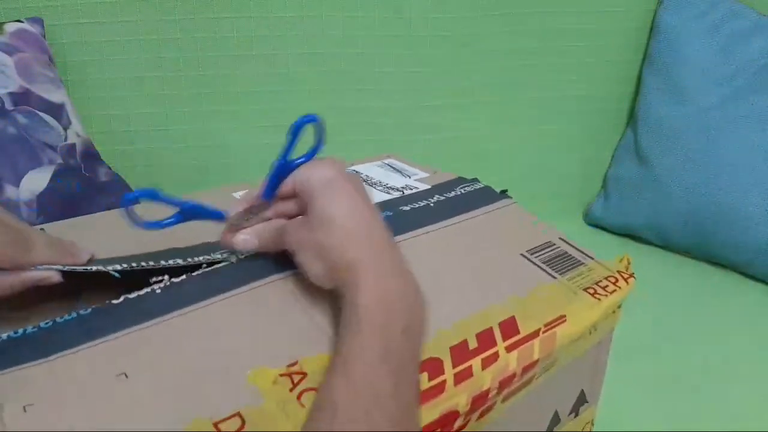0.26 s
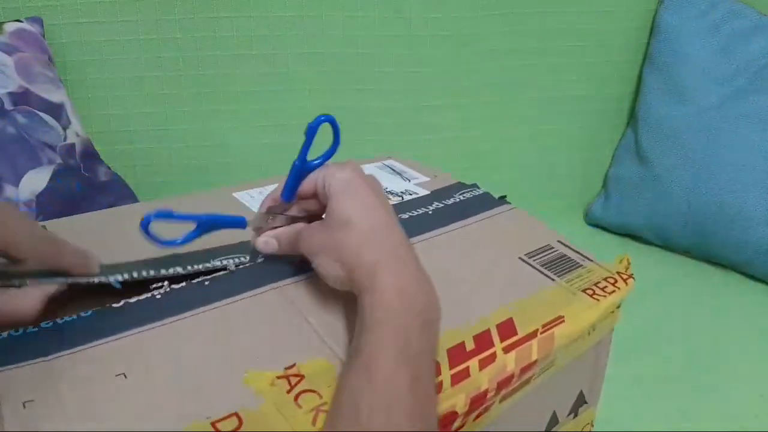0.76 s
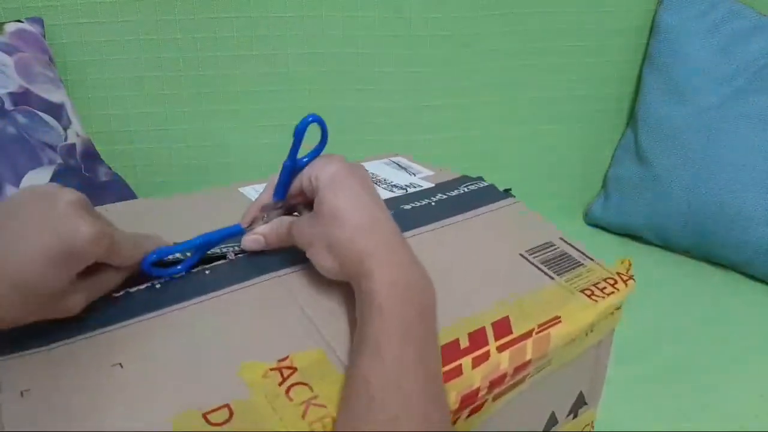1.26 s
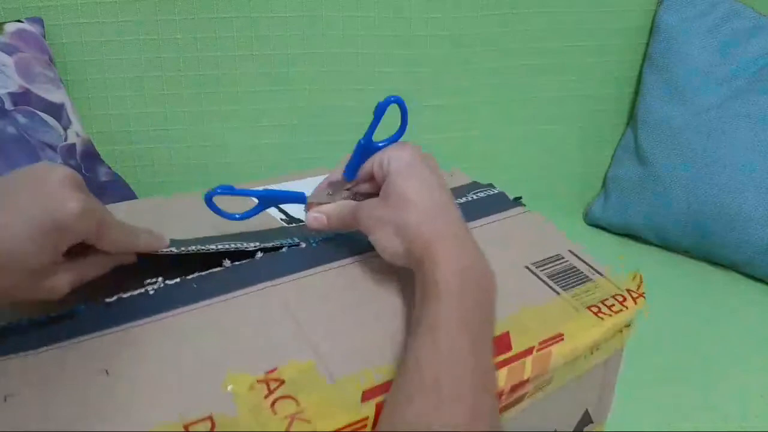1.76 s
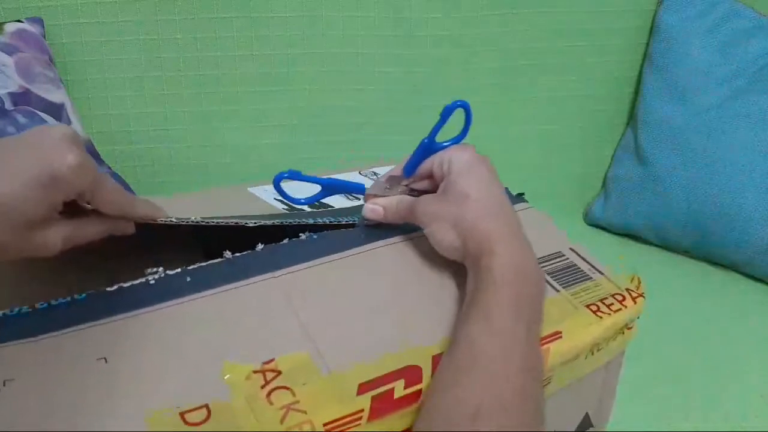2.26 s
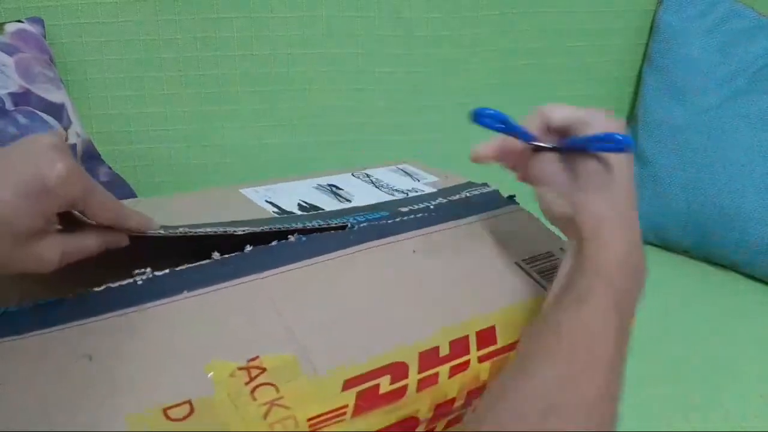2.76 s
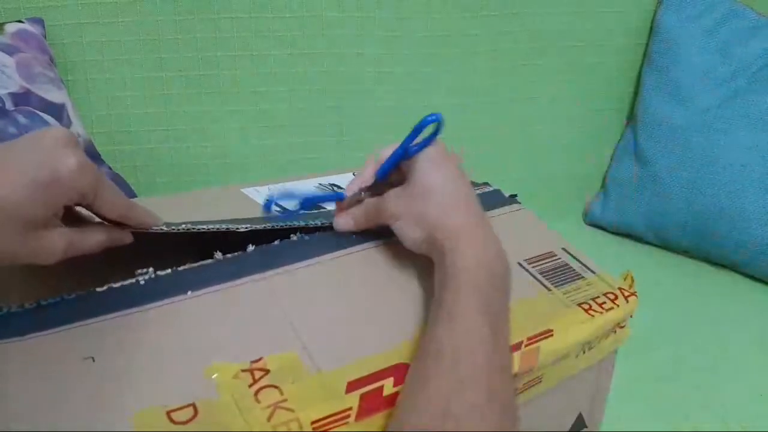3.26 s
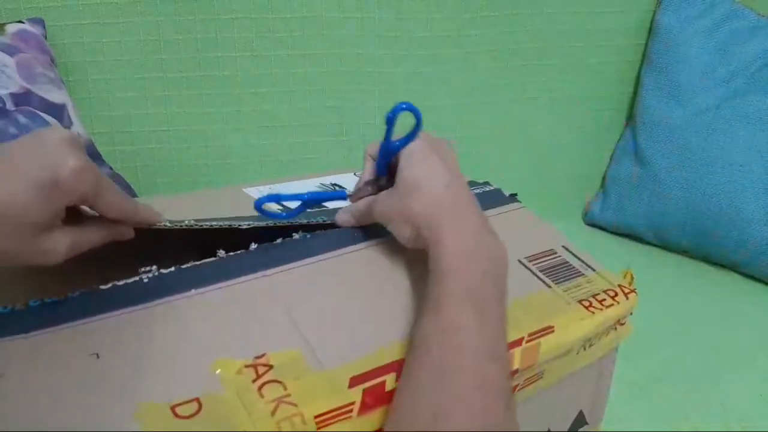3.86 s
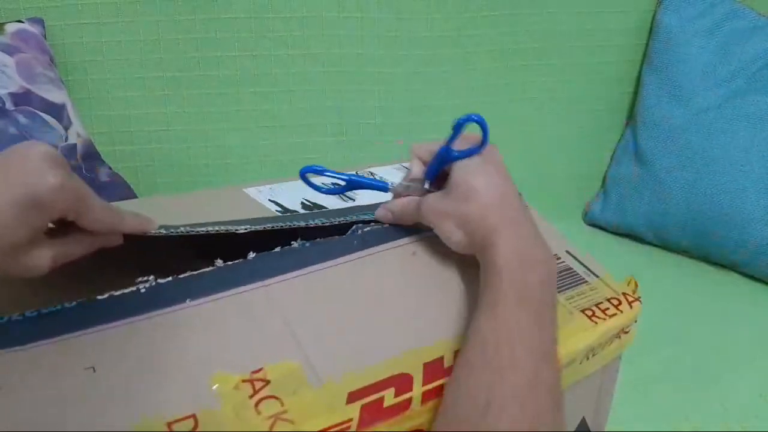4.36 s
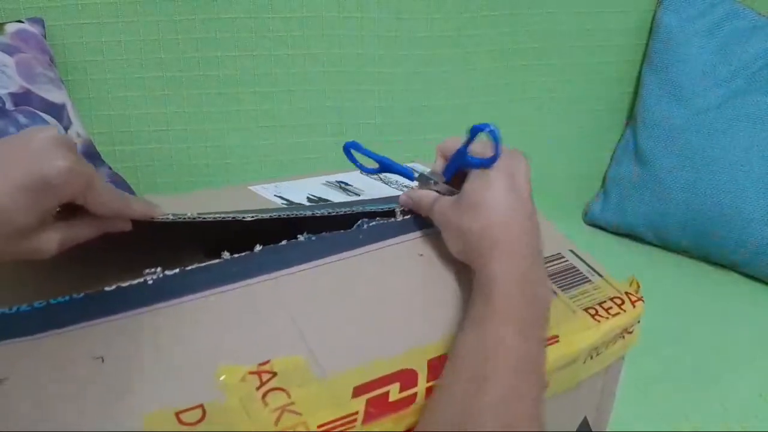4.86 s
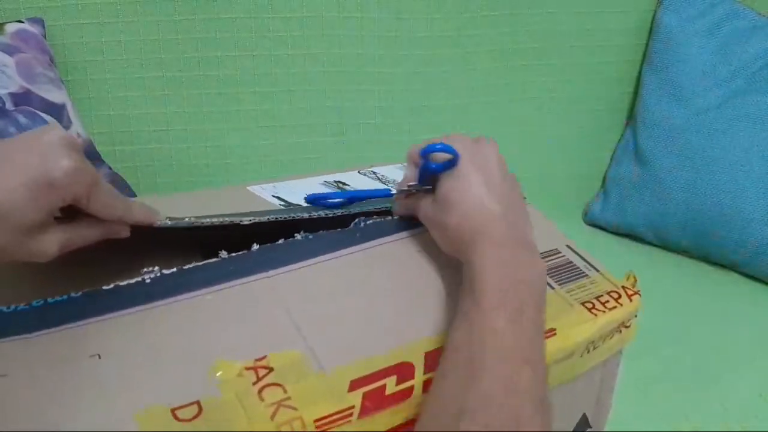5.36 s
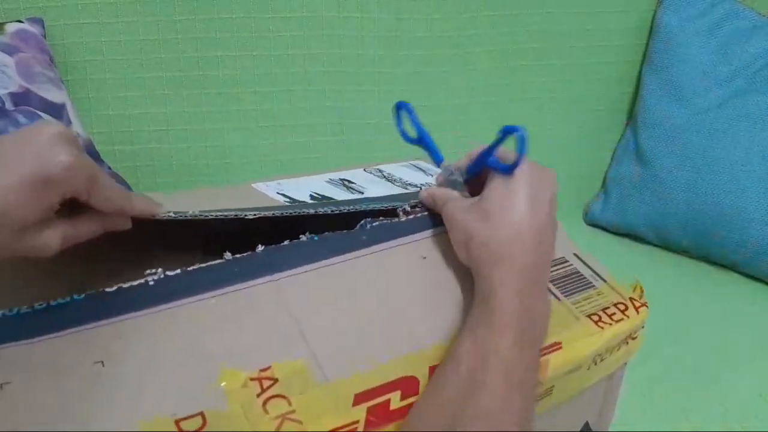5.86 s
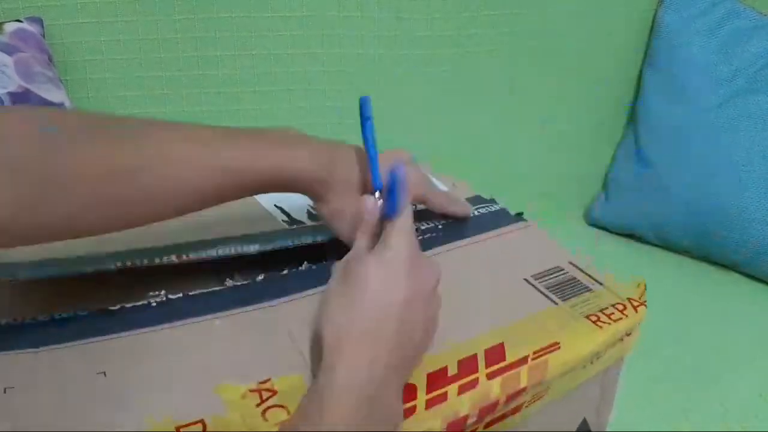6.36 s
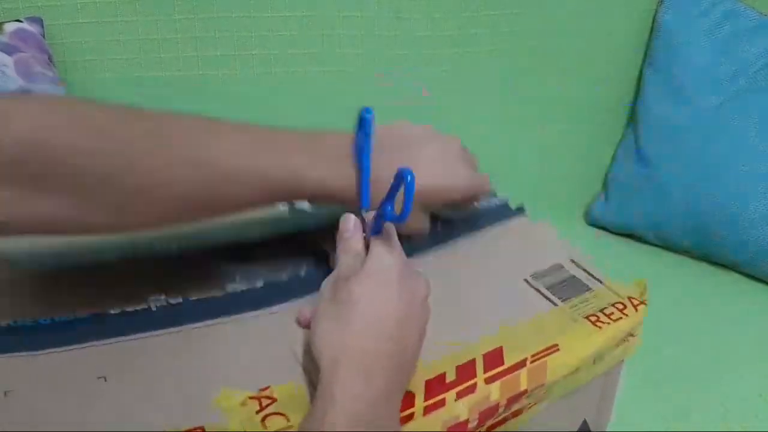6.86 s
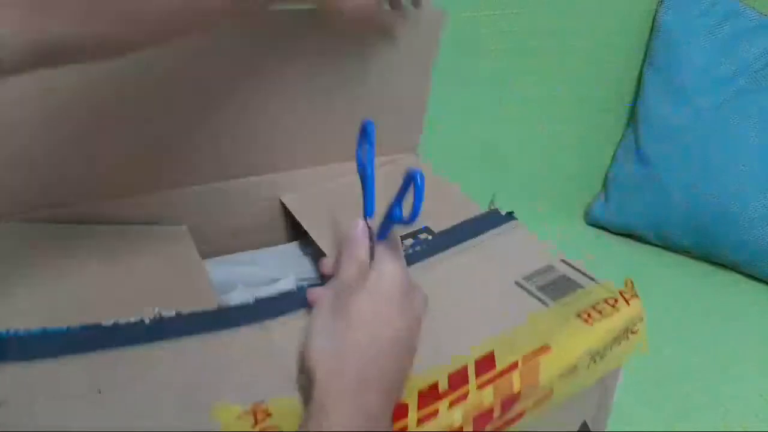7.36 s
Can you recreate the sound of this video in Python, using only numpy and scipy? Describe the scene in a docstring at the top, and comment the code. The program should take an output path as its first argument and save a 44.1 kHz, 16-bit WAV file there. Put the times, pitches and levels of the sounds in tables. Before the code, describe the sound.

Irregular bursts of ripping tape, each a crackle with a boomy cardboard thud, separated by quiet scraping and near-silent gaps. A quieter passage follows the heaviest cracks, then more thumps and ticks near four to five seconds. Hand rubbing grows on the lid after six seconds, with crisp pops, a short dropout to silence, and two final snaps. Close microphone, short natural indoor reverberation, very quiet background.

```python
"""Tape rips in cracks, deep thumps and dry ticks over rough rubbing, close up in a small furnished room.
A scissor blade slits the packing tape along the seam of a cardboard box: it drags, sticks and jumps.
Each jump is a burst of random snaps, filtered by lid, board and tape; rubbing is dense slips and hiss.
Then a hand slides over the lid and pulls a flap, whose last bits of tape pop loose.
The sound drops out briefly on the way."""
import sys
import numpy as np
from scipy import signal
from scipy.fft import rfft, irfft, next_fast_len
from scipy.io import wavfile
from scipy.ndimage import uniform_filter1d, map_coordinates

SR = 44100
rng = np.random.default_rng(int(sys.argv[2]) if len(sys.argv) > 2 else 0)


def output_pcm(signal):
    """Save a mono or channel-first signal as 16-bit PCM at the path in sys.argv[1].

    Samples are clipped to [-1, 1] before scaling.
    """
    pcm = np.clip(np.atleast_2d(signal).T, -1, 1) * 32767
    wavfile.write(sys.argv[1], SR, np.round(pcm).astype(np.int16))


N = 336042

# colour of rubbing: f/Hz, relative level/dB
RUB_COLOUR = [(18, -63), (30, -38.5), (63, -5.5), (125, -4), (185, -7), (332, -4), (378, -11), (547, -17),
              (625, -18.5), (694, -22), (1270, -23.5), (8530, -31), (11700, -26), (15500, -25.5),
              (16500, -43.5)]

SIZE = 32768  # samples in a single sound or response
HZ = np.fft.rfftfreq(SIZE, 1 / SR)
AGE = np.arange(SIZE) / SR


def amp(db):
    """Decibels to gain."""
    return 10 ** (np.asarray(db) / 20)


def unit(x):
    """Scale to rms 1."""
    return x / np.sqrt(np.mean(x ** 2) + 1e-30)


def along(points, hz):
    """Read (f/Hz, value) points on a log frequency axis."""
    f, v = np.transpose(points)
    return np.interp(np.log(hz + 1), np.log(f + 1), v)


def wobble(rate, size):
    """A smooth random curve, rate knots a second."""
    knots = rng.standard_normal(int(size * rate / SR) + 4)
    return map_coordinates(knots, [np.arange(size) * rate / SR])


def add(track, s, sound):
    """Mix a sound into a track at s seconds."""
    start = int(np.clip(round(s * SR), 0, N - 1))
    track[start:start + len(sound)] += sound[:N - start]


def resonance(hz, width):
    """Response of one damped mode, 1 at its centre; width in Hz."""
    return 1j * HZ * width / (hz ** 2 - HZ ** 2 + 1j * HZ * width)


def causal(gain):
    """The minimum-phase response with this gain, by folding its cepstrum."""
    cepstrum = irfft(np.log(np.maximum(gain, 1e-6)))
    cepstrum[1:SIZE // 2] *= 2
    cepstrum[SIZE // 2 + 1:] = 0
    return np.exp(rfft(cepstrum))


def below(edge_hz):
    """Share of the power that falls below a soft edge."""
    return 1 / (1 + (HZ / edge_hz) ** 8)


def radiators(colour):
    """Responses of the lid (bass), the board (middle) and the tape (treble), with the box's resonances."""
    # resonances of the box: f/Hz, width/Hz, level/dB over its broad response
    box_modes = [(127.1, 31, 3.5), (249.4, 13, -2), (314, 67, -4), (461.7, 19, -8), (476, 6.6, -1.5),
                 (529, 11, -11.5), (617, 7.4, 2), (755.5, 7.7, 1.5), (1070, 22, -11), (1249, 45, 0),
                 (1364, 14, -7.5), (1493, 8.6, -14.5), (1724, 12, -12), (1905, 35, -8.5), (2250, 35, -7.5)]
    lid_hz, film_hz = 600, 4000  # upper edges of lid and board
    shares = [below(lid_hz), (1 - below(lid_hz)) * below(film_hz), 1 - below(film_hz)]
    body = 1 + sum(amp(db) * resonance(hz, width) for hz, width, db in box_modes)
    gain = amp(along(colour, HZ))
    return [causal(gain * np.sqrt(share)) * body for share in shares]


def fractures(rate, scatter_db, size):
    """Tiny snaps at random moments, rate a second, of very unequal strength."""
    happens = rng.random(size) < rate / SR
    sign = rng.choice([-1, 1], size)
    return happens * sign * amp(scatter_db * rng.standard_normal(size))


def in_room(burst, wet_db):
    """Spectrum of a burst plus a fresh diffuse tail, which builds up as the burst feeds the room."""
    # reverberation of the room: f/Hz, t60/s
    room_decay = [(100, 0.24), (400, 0.37), (1200, 0.34), (3000, 0.31), (8000, 0.32), (15000, 0.27)]
    hz, t, z = signal.stft(rng.standard_normal(SIZE), SR, nperseg=256)
    decay = amp(-60 * t / along(room_decay, hz)[:, None])
    tail = signal.istft(z * decay, SR, nperseg=256)[1][:SIZE]
    tail = tail * np.sqrt(np.cumsum(burst ** 2))
    return rfft(unit(burst) + amp(wet_db) * unit(tail))


def hush(level_db=-83):
    """The faint noise of the quiet room: steady noise in the colour of rubbing."""
    colour = irfft(causal(amp(along(RUB_COLOUR, HZ))))
    return amp(level_db) * unit(signal.fftconvolve(rng.standard_normal(N), colour)[:N])


def strokes():
    """Force on lid, board and tape: each stroke takes hold, grows or eases, and lets go, unevenly."""
    # strokes of the blade or the hand: start t/s, length/s, level/dB before trims,
    # rise along the stroke/dB, extra in the lid/dB, extra in the tape/dB
    stroke_rows = [(0, 0.039, -37, -10, 5, -6.5), (0.153, 0.044, -51.5, -14, 2, -5),
                   (0.238, 0.023, -42, 14, 4.5, -7.5), (0.431, 0.1, -55.5, 5, 11, -0.5),
                   (0.712, .06, -59.5, 5, 8, 2.5), (0.788, .25, -51, 0.5, 4, -2.5),
                   (1.047, 0.19, -60.5, -13, 5.5, -2), (1.278, 0.19, -60.5, 0, 1.5, -0.5),
                   (1.687, 0.17, -65.5, 4, -7, 6), (2.11, 0.22, -47.5, -7, -1, -8),
                   (2.39, 0.14, -70, -14, 4.5, 1.5), (2.499, 0.091, -45.5, 34, 7, -11),
                   (3.216, 0.046, -44.5, -11, 7, -13.5), (3.243, 0.47, -64.5, 1, 7, -14.5),
                   (3.503, 0.12, -57.5, -8, 7.5, -9), (3.719, 0.22, -67.5, -20, 4, -8.5),
                   (3.954, 0.098, -64, 14, 0, 2.5), (4.208, 0.03, -49.5, -9.5, 3, -7.5),
                   (4.306, 0.21, -49.5, -11, 9, -4.5), (4.713, 0.22, -55.5, -2, 1, -9.5),
                   (4.833, 0.22, -52.5, -7.5, 3, -9.5), (5.067, 0.34, -57.5, -5.5, 7, -9),
                   (5.269, 0.021, -53, -18.5, 11.5, -7.5), (5.406, 0.18, -59.5, -3.5, 3.5, 1),
                   (5.653, 0.31, -53, 4, 2.5, -8.5), (5.97, 0.19, -49.5, 6, 10, 1.5),
                   (6.177, 0.081, -45, -2.5, 5, 2), (6.294, 0.18, -46.5, -1.5, 2.5, -2),
                   (6.559, 0.1, -43.5, -14, 0, -6), (6.818, .13, -37, 2, 5, -8),
                   (7.406, 0.23, -41, 3, 3, -6.5)]
    attack_s, release_s = .012, .021
    uneven_db, uneven_rate = 0.76, 22
    bump_db, bump_rate = 3, 30
    t = np.arange(N) / SR
    power = np.zeros((3, N))
    for start, length, db, rise_db, lid_db, tape_db in stroke_rows:
        early = np.maximum(start - t, 0)
        late = np.maximum(t - start - length, 0)
        grip = np.exp(-early / attack_s - late / release_s)
        progress = np.clip((t - start) / length, 0, 1)
        effort = grip * amp(db + rise_db * (progress - .5))
        power += (amp([[lid_db], [0], [tape_db]]) * effort) ** 2
    force = np.sqrt(power) * amp(uneven_db * wobble(uneven_rate, N))
    # the loose lid bumps about under the hand
    force[0] *= amp(bump_db * wobble(bump_rate, N))
    return force


def drag():
    """Sliding friction: dense slips, in uneven clumps, shake lid, board and tape together."""
    slip_rate, scatter_db = 1200, 6.5  # slips a second, spread of their strength
    judder_db, judder_rate = 2.5, 70
    rasp_hz, rasp_width, rasp_db, rasp_drift = 1800, 300, 1, 0.26  # drift in log frequency
    wet_db, boom_db = -1, 8
    hiss_shares = (.15, .18, .7)  # of the power in lid, board, tape
    trims_db = (-0.3, -0.6, 0.2)
    clumps = fractures(slip_rate, scatter_db, N) * amp(judder_db * wobble(judder_rate, N))
    # level the random slips to an even strength over a tenth of a second
    slips = clumps / np.sqrt(np.abs(uniform_filter1d(clumps ** 2, size=SR // 10)) + 1e-9)
    lid, board, tape = radiators(RUB_COLOUR)
    bodies = [lid * (1 + amp(boom_db) * resonance(80.5, 12)), board, tape]
    step = SIZE // 4
    out = np.zeros(N)
    for body, push, trim_db, share in zip(bodies, strokes(), trims_db, hiss_shares):
        # the finest slips, too many to tell apart, merge into hiss, most of all in the treble
        texture = np.sqrt(1 - share) * slips + np.sqrt(share) * rng.standard_normal(N)
        force = texture * push * amp(trim_db)
        # the board's rasp and the paths through the room change as the hand moves on
        for start in range(0, N, step):
            drifted_hz = rasp_hz * np.exp(rasp_drift * rng.standard_normal())
            rasp = 1 + amp(rasp_db) * resonance(drifted_hz, rasp_width)
            response = irfft(body * rasp * in_room(signal.unit_impulse(SIZE), wet_db))
            response = response / np.linalg.norm(response)
            add(out, start / SR, signal.fftconvolve(force[start:start + step], response))
    return out


def tearing(swell, snaps, scatter_db, lag):
    """A burst of snaps that swells and dies as the film gives way in fits and starts; energy 1."""
    stutter_db, stutter_rate = 2.0, 260
    u = np.maximum(AGE - lag, 0) / swell
    stutter = amp(stutter_db * wobble(stutter_rate, SIZE))
    burst = fractures(snaps / swell, scatter_db, SIZE) * stutter * u * np.exp(1 - u)
    return burst / np.linalg.norm(burst)


def boom(hz=80.5, t60=.72, attack=.02):
    """The room's lowest mode hums on after a thump: a decaying sine with a soft onset."""
    return np.sin(2 * np.pi * hz * AGE) * amp(-60 * AGE / t60) * (1 - np.exp(-AGE / attack))


def rips():
    """Each jump is a burst of snaps; lid and board ring at the pitches of the spot struck."""
    # jumps of the blade and pops of the tape: t/s, swell time/s, lid f/Hz, board f/Hz,
    # then before trims: lid thump level/dB, board crack level/dB, tape fizz level/dB
    rip_rows = [(.27, .008, 262, 1740, -25, -33.5, -39.5), (.531, 0.0031, 262, 1180, -39.5, -45, -45),
                (.795, .004, 189, 2400, -41.5, -57.5, -56), (.86, .005, 150, 800, -41.5, -60, -58.5),
                (0.994, 0.0045, 306, 1720, -43, -60.5, -53), (1.504, 0.0025, 220, 790, -32.5, -40, -37.5),
                (1.516, 0.018, 178, 1580, -15.5, -27, -29), (1.89, .0025, 282, 1630, -26, -26.5, -29.5),
                (2.075, 0.0031, 254, 1750, -22.5, -28, -30.5),
                (2.21, .0055, 143, 1390, -24.5, -34.5, -37.5),
                (2.244, 0.0012, 130, 1470, -21.5, -31, -29.5), (2.593, .0016, 440, 1690, -17, -20.5, -26.5),
                (2.6126, 0.0044, 330, 1660, -18.5, -19, -26), (3.19, .0025, 149, 1300, -35.5, -51, -63),
                (3.322, .005, 140, 1780, -38.5, -48.5, -53.5), (3.365, .006, 233, 1270, -38, -50, -56),
                (3.528, 0.0037, 195, 1320, -44, -50.5, -55), (4.005, 0.0045, 192, 3870, -46.5, -60, -55),
                (4.078, 0.0034, 234, 1990, -28.5, -40.5, -41.5),
                (4.308, .004, 174, 1980, -32.5, -59, -44.5), (4.319, 0.004, 127, 1940, -20.5, -31.5, -32.5),
                (4.467, .0015, 160, 1320, -24.5, -36, -35.5), (4.632, .0035, 131, 1500, -26.5, -38, -42.5),
                (4.808, .005, 286, 1700, -41.5, -52.5, -53), (5.013, .004, 288, 1940, -43.5, -59.5, -51.5),
                (5.507, .002, 275, 2680, -51, -50, -48.5), (5.702, 0.0022, 314, 1290, -40, -39.5, -44),
                (5.862, 0.002, 280, 910, -21.5, -31, -36), (6.126, .006, 132, 830, -33, -47.5, -54.5),
                (6.291, .003, 310, 2490, -41.5, -61, -56.5), (6.535, .002, 342, 1410, -49, -43.5, -49.5),
                (6.6126, 0.0005, 414, 1124, -20, -22.5, -25.5),
                (6.7031, 0.00088, 288, 2570, -25.5, -24.5, -27.5),
                (6.882, 0.0076, 285, 826, -28.5, -44.5, -49.5), (7.393, .003, 289, 3670, -41, -38, -37),
                (7.579, .0006, 376, 1600, -27.5, -25.5, -35),
                (7.594, 0.00094, 323, 2370, -27.5, -27, -28.5)]
    # colour of tearing: f/Hz, relative level/dB
    tear_colour = [(18, -52.5), (30, -11.5), (118, 0), (306, -0.5), (858, -14.5), (1120, -15), (2160, -16),
                   (2970, -20), (3300, -22.5), (3860, -25), (6900, -31), (8760, -35.5), (12300, -24),
                   (15600, -26.5), (16500, -35.5)]
    # the run-on against the break: level/dB for lid, board and tape
    run_on_levels = (-3.5, -11.5, -10.5)
    scatter_db, lead = 4, 0.63
    run_on_lag_s, run_on_swell_s = .0055, .011
    strain_s, strain_growth_s, strain_db, strain_rate = .02, .0042, -21, 6000
    lid_ring_db, lid_width, board_ring_db, beam_db, board_breadth = 7, 60, -3, 5, 0.22
    lid_wet_db, board_wet_db, tape_wet_db, spread_db = -2.0, 4.5, 1, 1.35
    thump_trim_db, crack_trim_db, fizz_trim_db = 1.8, 3.5, 2.0
    boom_db, boom_swell_s = -8.5, .013
    out = np.zeros(N)
    lid, board, tape = radiators(tear_colour)
    hum = boom()
    straining = np.exp(-np.abs(AGE - strain_s) / strain_growth_s) * (AGE < strain_s)
    for s, swell, lid_hz, board_hz, thump, crack, fizz in rip_rows:
        # before each break the strained film starts to crackle
        strain = fractures(strain_rate, scatter_db, SIZE) * straining
        burst = tearing(swell, 50, scatter_db, strain_s)
        burst += amp(strain_db) * strain / np.linalg.norm(strain)
        # one main break at the crest, which stands out in the shortest bursts
        burst[int((strain_s + swell) * SR)] += lead * min(1, 0.0012 / swell)
        # the tear runs on a little while the lid springs back
        run_on = tearing(run_on_swell_s, 30, 7, strain_s + run_on_lag_s)
        # a single crack beams from one spot; a long tear spreads more of its sound round the room
        spread = spread_db * np.log2(min(swell, .004) / .004)
        spot = resonance(board_hz, board_breadth * board_hz)
        beam = amp(beam_db) * spot * rfft(unit(burst))
        flexing = lid * (1 + amp(lid_ring_db) * resonance(lid_hz, lid_width))
        cracking = board * (1 + amp(board_ring_db) * spot)
        parts = [(flexing, 0, thump + thump_trim_db, lid_wet_db),
                 (cracking, beam, crack + crack_trim_db, board_wet_db),
                 (tape, 0, fizz + fizz_trim_db, tape_wet_db)]
        for (body, beamed, db, wet_db), run_on_db in zip(parts, run_on_levels):
            source = burst + amp(run_on_db) * run_on
            sound = irfft((in_room(source, wet_db + spread) + beamed) * body)
            # levels count the energy as if spread over 50 ms
            add(out, s - strain_s, amp(db) * sound * np.sqrt(.05 * SR / np.sum(sound ** 2)))
        # a quick thump sets the room humming, a slow push hardly does
        add(out, s, amp(thump + boom_db) * hum / (1 + (swell / boom_swell_s) ** 2))
    return out


def ticks():
    """Single small snaps of board and tape, too light to move the lid: tiny noise bursts that ring."""
    # dry ticks of the blade and the tape's edge: t/s, peak level/dB before the trim, centre f/Hz
    tick_rows = [(0.5554, -36, 1940), (0.7183, -34.5, 3770), (0.7432, -33, 2150), (1.3059, -43.5, 2260),
                 (1.703, -29, 2110), (2.2974, -24, 1680), (2.6654, -14.5, 1900), (3.479, -33, 2500),
                 (3.6188, -36.5, 2390), (4.9072, -22.5, 1520), (4.9861, -25.5, 1520), (5.4131, -29, 1500),
                 (5.655, -28.5, 3060), (6.1968, -23, 2200), (6.3135, -25, 2310), (6.3385, -26, 3950),
                 (6.3669, -25.5, 1890), (6.8588, -8.5, 4570), (7.4934, -21.5, 2200), (7.5248, -20.5, 1560)]
    breadth, ring_db, wet_db, trim_db = 0.4, 6, -3.0, 2  # breadth as a fraction of the centre
    out = np.zeros(N)
    _, board, tape = radiators(RUB_COLOUR)
    for s, db, hz in tick_rows:
        snap = rng.standard_normal(SIZE) * np.exp(-AGE / .00035)
        ring = 1 + amp(ring_db) * resonance(hz, breadth * hz)
        sound = irfft(in_room(snap, wet_db) * (board + tape) * ring)
        add(out, s, amp(db + trim_db) * sound / np.abs(sound).max())
    return out


def scene():
    """All the sounds of the box at one microphone."""
    return (hush() + drag() + rips() + ticks())[None]


def record(dry):
    """The microphone's bass cut, a brief dropout, full-scale clipping and the band limit."""
    # the sound drops out briefly: t/s, level/dB
    dropout = [(6.925, -4), (6.97, -14.5), (7.02, -23.5), (7.12, -72.5), (7.383, -67), (7.394, -2)]
    low_cut_hz, top_hz = 57, 15800
    x = signal.sosfilt(signal.butter(2, low_cut_hz, "highpass", fs=SR, output="sos"), dry)
    t, level_db = np.transpose(dropout)
    x = np.clip(x * amp(np.interp(np.arange(N) / SR, t, level_db)), -1, 1)
    padded = next_fast_len(N + SR // 2)
    band = np.sqrt(1 / (1 + (np.fft.rfftfreq(padded, 1 / SR) / top_hz) ** 200))
    return irfft(rfft(x, padded) * band, padded)[..., :N]


dry = scene()
out = record(dry)
output_pcm(out)
```